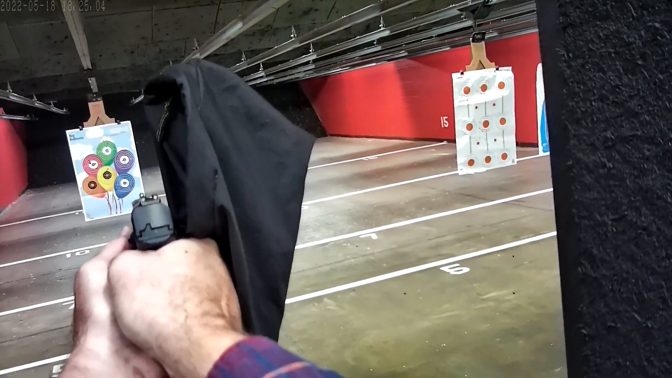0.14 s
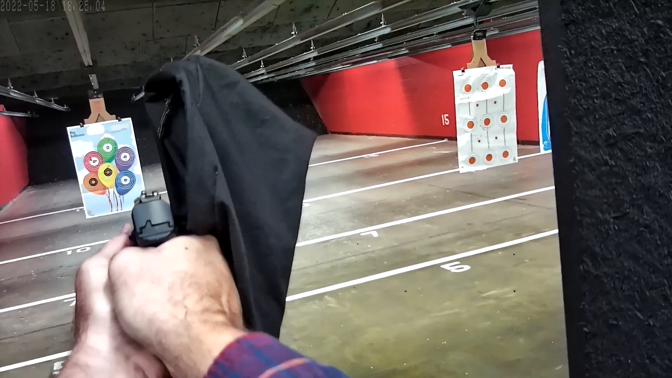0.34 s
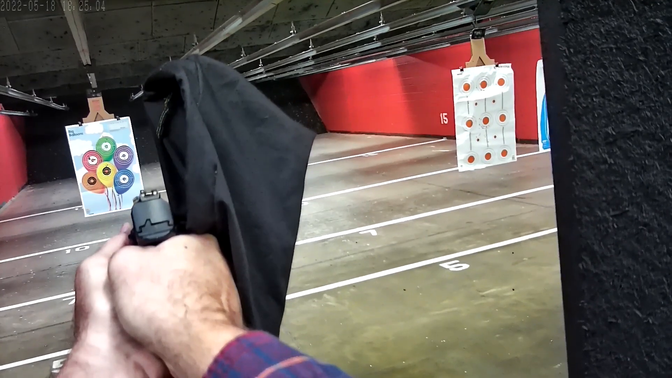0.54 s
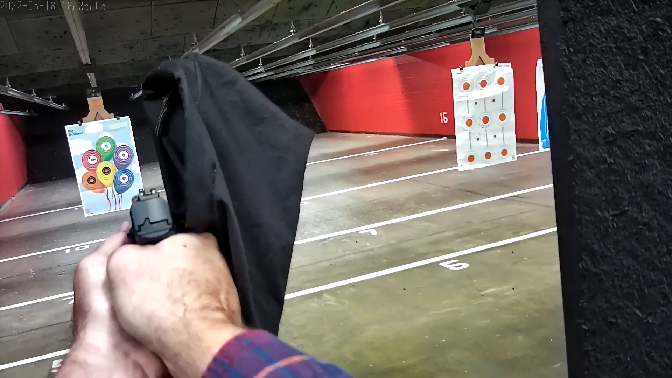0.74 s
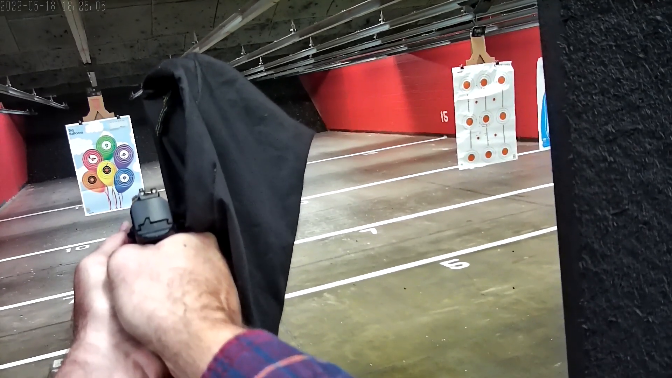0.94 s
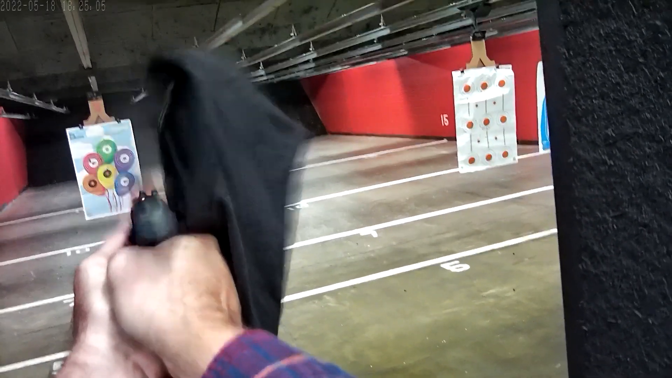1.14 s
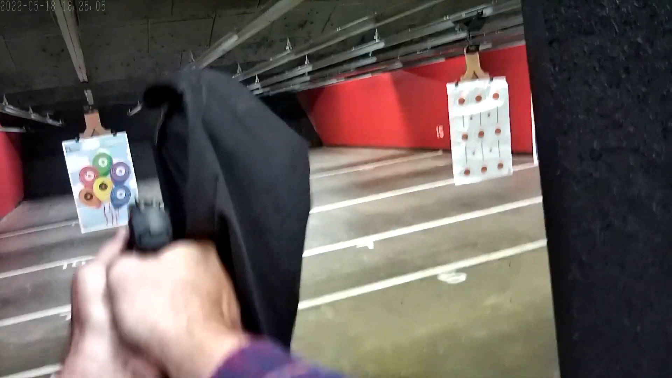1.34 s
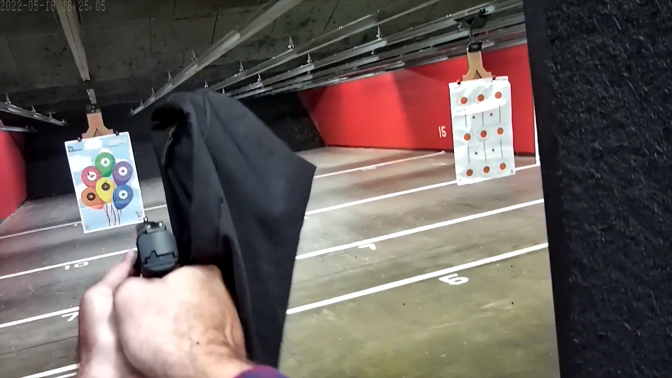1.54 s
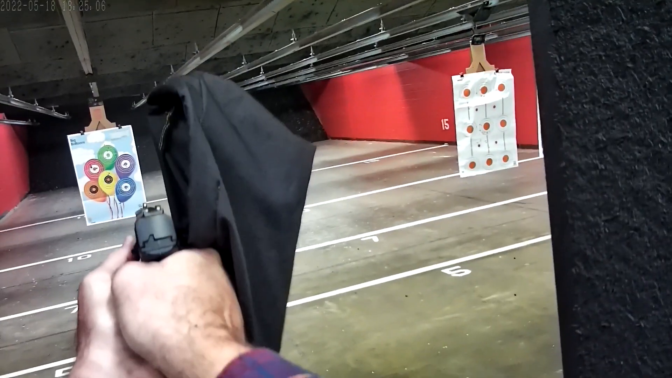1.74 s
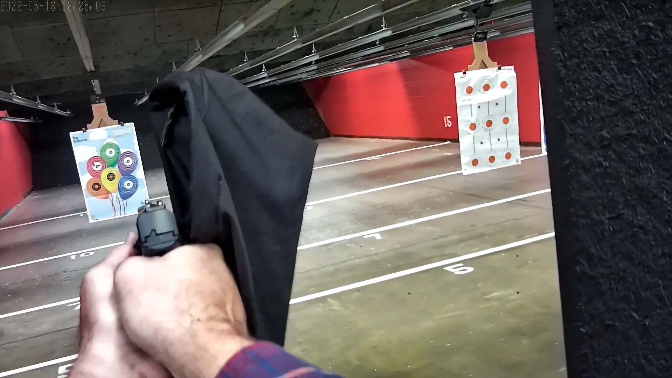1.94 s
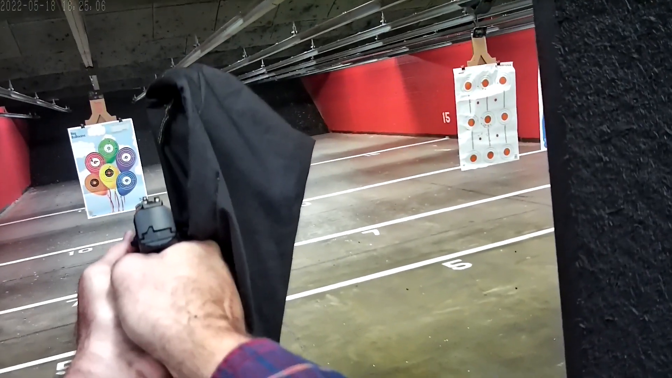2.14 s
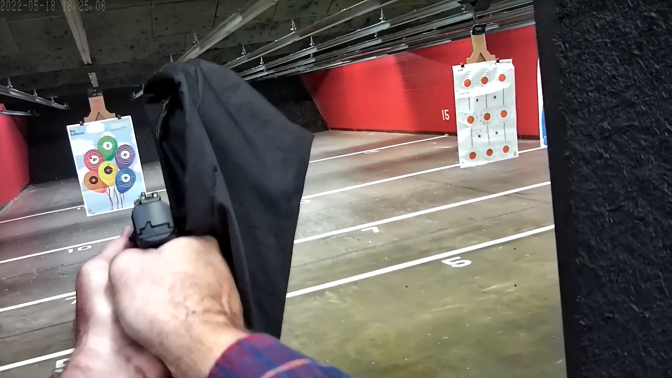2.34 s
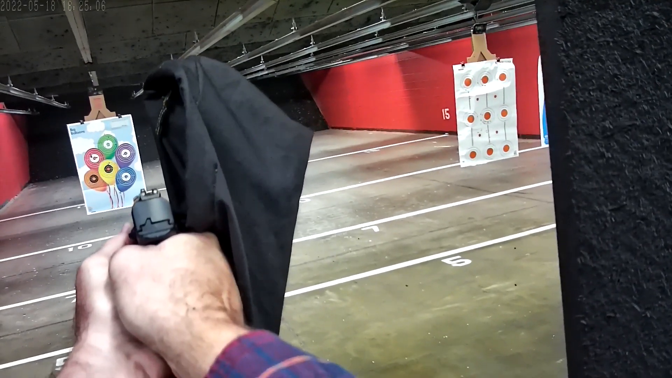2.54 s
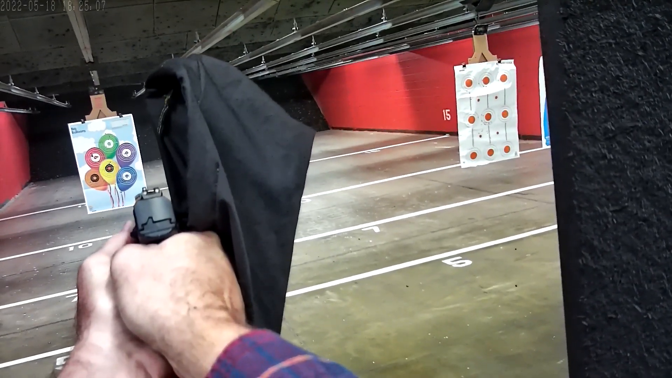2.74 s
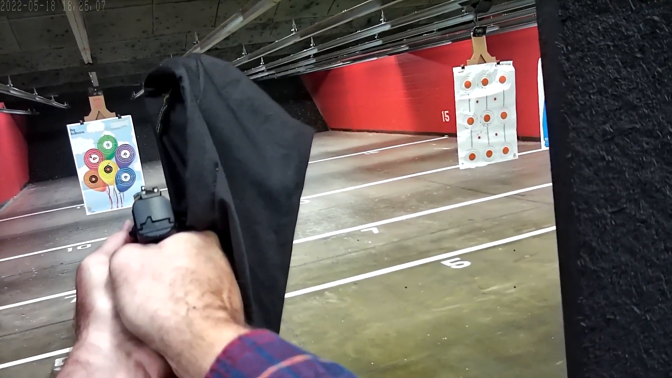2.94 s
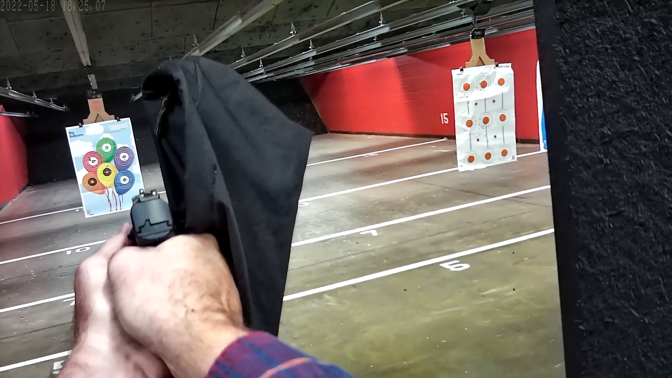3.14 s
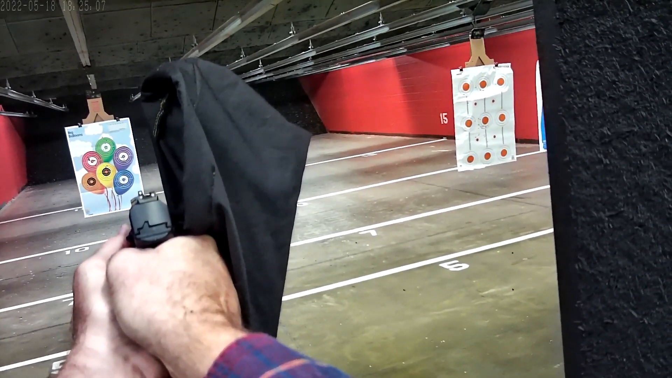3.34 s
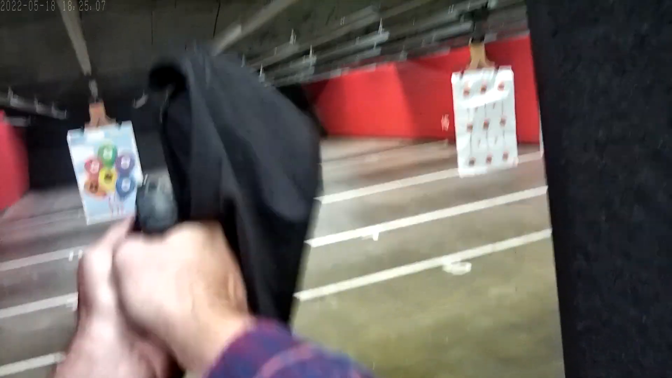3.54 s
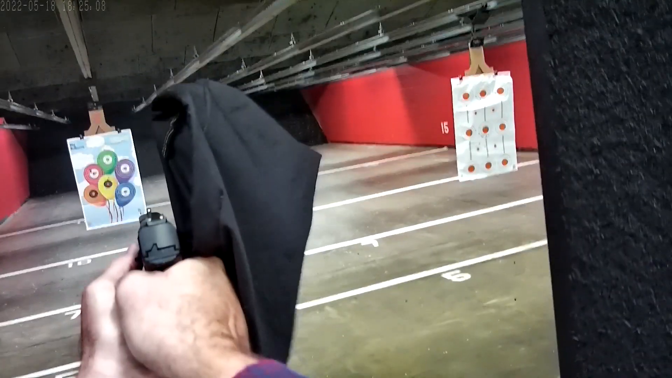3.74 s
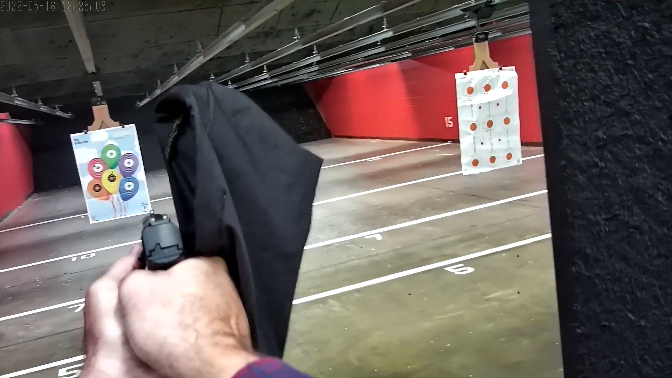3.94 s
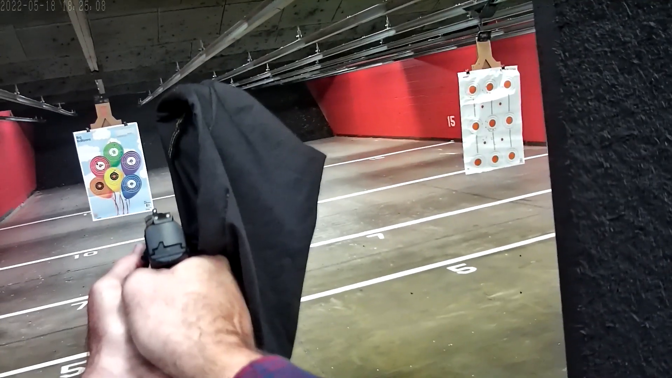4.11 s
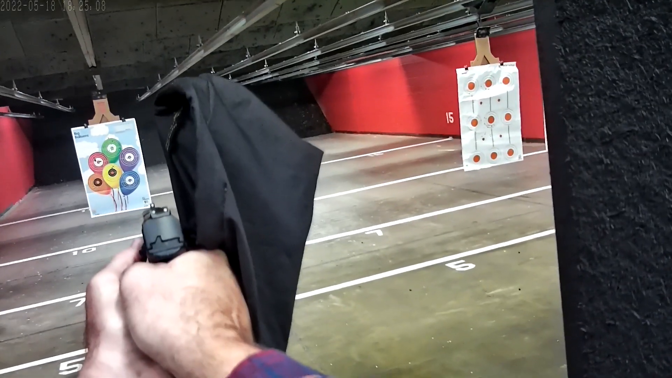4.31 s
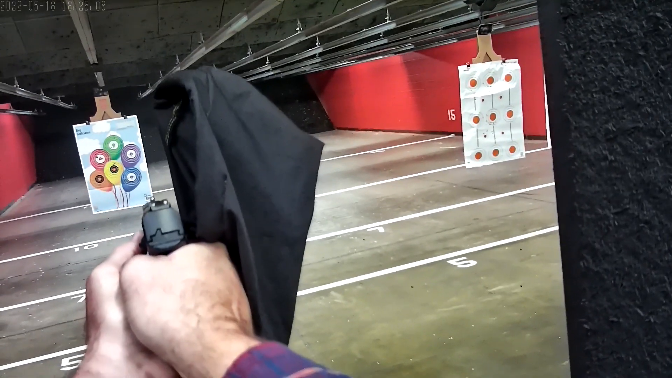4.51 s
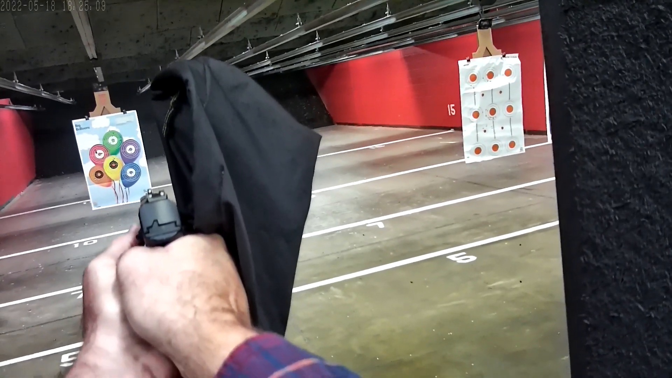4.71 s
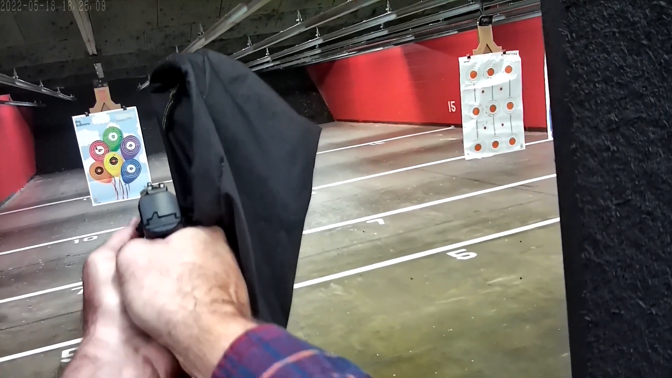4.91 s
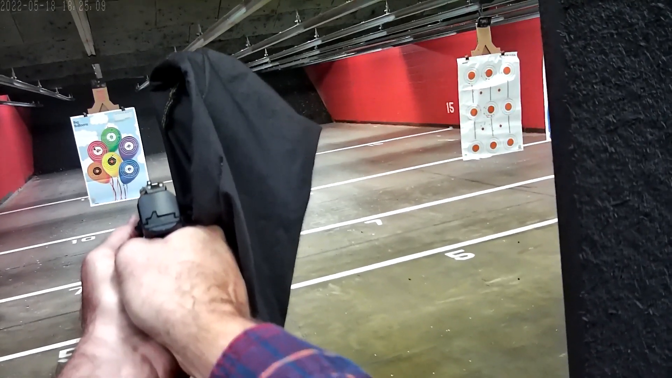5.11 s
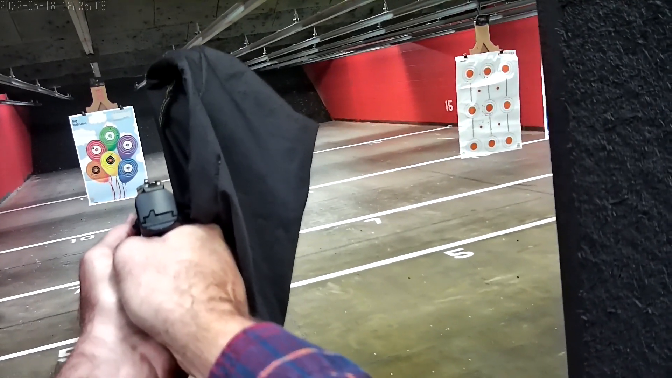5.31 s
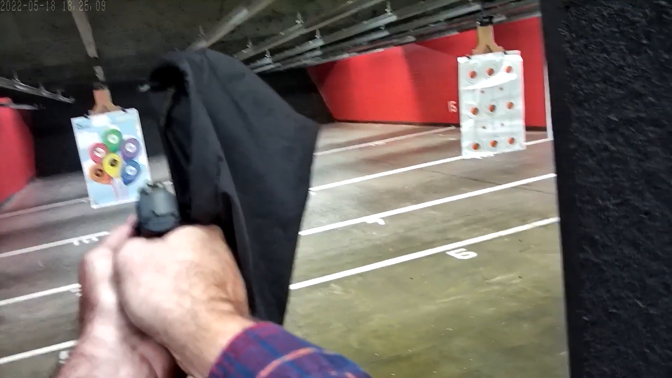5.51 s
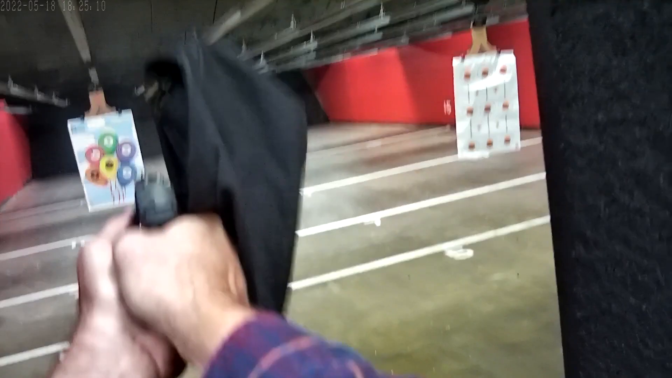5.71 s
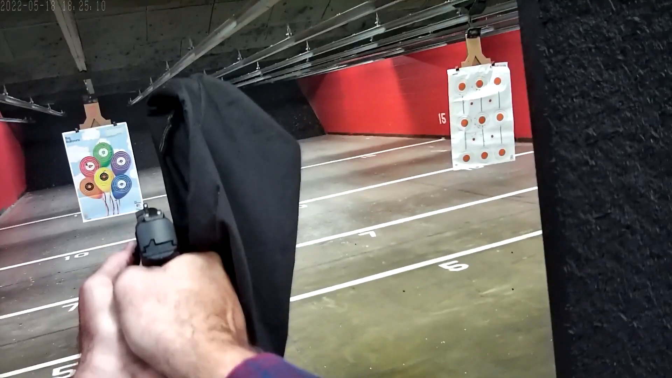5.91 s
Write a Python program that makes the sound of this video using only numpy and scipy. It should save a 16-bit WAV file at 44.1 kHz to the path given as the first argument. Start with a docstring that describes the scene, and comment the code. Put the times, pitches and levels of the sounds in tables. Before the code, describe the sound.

In a hard, low indoor shooting range, two quick shots from other lanes come first, then a close pistol blast, another lane shot, a second close blast, and finally a close shot overlapped by a distant one. All overload the close microphone and leave short booming tails. Hard clacks, high brass tinkles and light ticks fill the gaps over faint ventilation.

```python
"""Pistols in an indoor range

Three pistols fire, one at arm's length and two in other lanes, and overload the microphone.
Each blast is coloured noise that fills the firing line, rolls down the hall and returns from the far end.
Decaying tones make the low room boom, and ring in the clacking parts and in the brass on the concrete.
Steady noise with a faint tone is the ventilation; an earlier shot is still dying away at the start."""
import sys
import numpy as np
from scipy import signal
from scipy.fft import rfft, irfft
from scipy.io import wavfile

SR = 44100
rng = np.random.default_rng(int(sys.argv[2]) if len(sys.argv) > 2 else 0)


def put_to_file(sound):
    """Save the sound as 16-bit audio at rate SR, in the file named by the first command-line argument."""
    columns = np.atleast_2d(sound).T  # one column per channel
    safe = np.clip(columns, -1, 1)
    whole_steps = np.round(safe * 32767)
    wavfile.write(sys.argv[1], SR, whole_steps.astype(np.int16))


N = 262821  # length in samples
AGE = np.arange(2 * SR) / SR  # seconds since a sound began

# Shots at arm's length (near), behind the partition (lane) and further along the line (distant).
# Each row: start in seconds, place, booth level in dB, muzzle crack in dB, hall level in dB.
SHOT_LIST = [ (.519, "lane", 0, 1, -0.5), (.673, "distant", -0.5, -6, -0.5), (1.1228, "near", -2, 12.5, 5),
             (2.4262, "lane", 0, -1, 1), (3.3643, "near", -0.5, 9.5, 5.5), (5.535, "near", -1, 12, 3.5),
             (5.694, "distant", 0.5, -15, -1.5), ]
# Colour of the sound returning from the far end. Each row: frequency in Hz, relative level in dB per Hz.
FAR_COLOUR = [(100, -8), (400, -5), (800, -12), (1350, 5), (2000, 5.5), (2700, -10.5), (3400, -17.5),
              (4000, -5.5), (5100, -40.5), (6100, -34), (7200, -48.5), (16000, -70.5)]
# How long that sound lasts. Each row: frequency in Hz, time to fall 60 dB in seconds.
FAR_DECAY = [(100, 0.54), (1500, 0.92), (4000, 1.48), (10000, 1.1)]
# Colour of hard parts touching. Each row: frequency in Hz, relative level in dB per Hz.
CONTACT_COLOUR = [(50, -28.5), (280, -20), (440, 3), (650, -15), (1000, -3.5), (1270, 5), (1550, -11.5),
                  (1900, 2.5), (3000, -12.5), (3900, -3.5), (5200, -30), (6200, -19.5), (7300, -25.5),
                  (11000, -25), (16000, -34)]


def undb(db):
    """Turn decibels into a gain."""
    return 10 ** (np.asarray(db) / 20)


def along(points, hz):
    """Read a value between (Hz, value) points, on a log-frequency axis."""
    f, value = np.transpose(points)
    return np.interp(np.log(hz + 1), np.log(f), value)


def fade(t60, age=AGE):
    """Exponential decay, 60 dB down after t60 seconds."""
    return np.exp(-np.log(1000) * age / t60)


def shape(x, points):
    """Colour a sound by (Hz, dB) points."""
    gain = undb(along(points, np.fft.rfftfreq(len(x), 1 / SR)))
    return irfft(rfft(x) * gain, len(x))


def noise(points, size=len(AGE)):
    """Noise of the given colour, scaled to an rms of 1."""
    x = shape(rng.standard_normal(size), points)
    return x / x.std()


def reverberation(points, t60s, age=AGE):
    """Dense echoes as fading noise: every half octave dies at its own rate."""
    spectrum = rfft(noise(points))
    hz = np.maximum(np.fft.rfftfreq(len(AGE), 1 / SR), 32)
    half_octaves = 2 * np.log2(hz)
    total = 0
    for k in range(10, 30):  # band centres from 32 Hz upward
        overlap = np.maximum(1 - abs(half_octaves - k), 0)  # neighbouring bands cross-fade
        band = irfft(spectrum * overlap)
        total = total + band * fade(along(t60s, 2 ** (k / 2)), age)
    return total


def clusters(rate, spread_db):
    """Reflections arrive in uneven bunches: a gain that wanders about rate times a second."""
    wander = np.interp(AGE * rate, np.arange(1024), rng.standard_normal(1024))
    return undb(spread_db * wander)


def ring(modes):
    """Sum of decaying tones (Hz, dB, t60 in s), each starting at a random phase."""
    total = 0
    for hz, db, t60 in modes:
        tone = np.sin(2 * np.pi * (hz * AGE + rng.random()))
        total = total + undb(db) * fade(t60) * tone
    return total


def butter(x, hz, kind, order=1):
    """Low-pass or high-pass filter that uses only past sound."""
    return signal.sosfilt(signal.butter(order, hz, kind, fs=SR, output="sos"), x)


def add(track, s, sound):
    """Mix a sound in at time s, in seconds."""
    start = int(s * SR)
    track[start:start + len(sound)] += sound[:N - start]


def earlier_shot(echo_db=-45):
    """The last of an earlier shot is still dying away down range, as fading echoes."""
    out = np.zeros(N)
    add(out, 0, undb(echo_db) * reverberation(FAR_COLOUR, FAR_DECAY))
    return out


def ventilation(air_db=-48, fan_hz=170.0, fan_db=-56):
    """Steady rush of air as coloured noise, with a faint fan tone."""
    # Colour of the moving air. Each row: frequency in Hz, relative level in dB per Hz.
    air_colour = [(25, -19), (45, -5.5), (80, -3), (165, -7), (250, -12), (400, -12), (700, -14.5),
                  (1300, -16), (1900, -19), (2800, -34), (4000, -36.5), (5200, -48), (10000, -45),
                  (16000, -55)]
    air = undb(air_db) * noise(air_colour, size=N)
    fan = undb(fan_db) * np.sin(2 * np.pi * fan_hz * np.arange(N) / SR)
    return air + fan


def pistol(place, blast, crack_colour, booth_db, fill_s, hall_db, far_db, far_s, far_rise_s, crack_t60,
           boom_db, flutter_db, treble_flutter_db, fill_db=5, build_s=0.077, round_trip_s=.063):
    """Shots from one place take the same paths through the room, so they share their echoes."""
    # Decay along the firing line. Each row: frequency in Hz, time to fall 60 dB in seconds.
    booth_decay = [(60, 0.64), (250, 0.5), (1000, 0.4), (4000, 0.36), (12000, 0.46)]
    # Colour of the hall's long reverberation. Each row: frequency in Hz, relative level in dB per Hz.
    hall_colour = [(25, -4.5), (50, 1.5), (80, 4), (120, 5), (200, 0), (500, 5), (1300, 5.5), (2000, 1),
                   (2800, -16), (4000, -10), (5200, -40.5), (6100, -25.5), (7300, -42), (10000, -43.5),
                   (16000, -58.5)]
    # Decay of the hall. Each row: frequency in Hz, time to fall 60 dB in seconds.
    hall_decay = [(60, 3.3), (150, 1.82), (500, 1.32), (1500, 1.98), (4000, 1.7), (8000, 1.5), (14000, 1.8)]
    # Standing waves between floor, ceiling and walls.
    # Each row: frequency in Hz, relative level in dB, time to fall 60 dB in seconds.
    standing_waves = [(52, -36, 1), (92, -23.5, 0.8), (115.8, -14.5, 1.35), (116, -24, 0.67),
                      (132.7, -26, 1.9), (147.3, -21.5, 1.6)]
    # The treble share of the echoes, which flutters by its own amount. Each row: frequency in Hz, gain in dB.
    treble_share = [(1500, -23), (3200, -1)]

    crack = noise(crack_colour) * fade(crack_t60)

    # reflections pile up along the firing line for fill_s before they decay
    fill_left = np.maximum(1 - AGE / fill_s, 0)
    filling = undb(booth_db - fill_db * fill_left) * clusters(rate=120, spread_db=1.0)
    booth = filling * reverberation(blast, booth_decay, np.maximum(AGE - fill_s, 0))

    # the hall and its standing waves take a moment to build up
    roll = undb(hall_db) * reverberation(hall_colour, hall_decay)
    boom = undb(boom_db) * ring(standing_waves)
    hall = (roll + boom) * (1 - np.exp(-AGE / build_s))

    # echoes from down range swell until the back wall's return at far_s, then die away
    swell = np.exp(-(np.minimum(AGE - far_s, 0) / far_rise_s) ** 2)
    far = undb(far_db) * swell * reverberation(FAR_COLOUR, FAR_DECAY, np.maximum(AGE - far_s, 0))
    echoes = hall + far * clusters(rate=120, spread_db=2.0)

    # flutter echo: the wave front passes again with every round trip between the side walls
    front = np.cos(2 * np.pi * AGE / round_trip_s)
    treble = shape(echoes, treble_share)
    rest = echoes - treble
    # a negative flutter level swaps the peaks and dips
    tail = rest * undb(flutter_db * front) + treble * undb(treble_flutter_db * front)

    out = np.zeros(N)
    for s, where, db, crack_db, tail_db in SHOT_LIST:
        if where == place:
            add(out, s, undb(db) * booth + undb(crack_db) * crack + undb(tail_db) * tail)
    return out


def near_action(lead_s=.004, click_db=-17, click_t60=.04, thump_db=-7, thump_hz=32, thump_t60=0.26):
    """Heard only up close: the striker snaps forward, then the muzzle gas pushes on the microphone."""
    out = np.zeros(N)
    for s, where, *_ in SHOT_LIST:
        if where == "near":
            click = noise(CONTACT_COLOUR) * fade(click_t60)
            thump = np.sin(2 * np.pi * thump_hz * AGE) * fade(thump_t60)
            add(out, s - lead_s, undb(click_db) * click)
            add(out, s, undb(thump_db) * thump)
    return out


def clacks(meet_s=0.0055, rise_s=0.0046, contact_t60=0.043, knock_hz=1275, knock_db=-4):
    """Hard parts slide together and hit home, ring briefly and wake the booth."""
    # Clacks in the booth. Each row: start in seconds, contact level in dB, ring in dB, room answer in dB.
    clack_list = [(1.615, -9, -30, -17.5), (2.9385, -11, -16, -19.5), (4.4962, -11, -14, -18.5)]
    # Colour of the booth's answer. Each row: frequency in Hz, relative level in dB per Hz.
    answer_colour = [(30, -12), (120, 0.5), (220, -15), (430, 1.5), (800, -3.5), (1200, -1.5), (2200, -7),
                     (3000, -16.5), (3900, -11), (5200, -28.5), (6200, -19), (7300, -34.5), (10000, -27),
                     (16000, -53)]
    # Decay of that answer. Each row: frequency in Hz, time to fall 60 dB in seconds.
    answer_decay = [(100, .8), (500, 0.45), (1500, 0.46), (4000, 0.43), (12000, 0.36)]
    # Ring of the parts. Each row: frequency in Hz, relative level in dB, time to fall 60 dB in seconds.
    part_modes = [(440, -11, 0.14), (1042, -3.5, 0.19), (1230, -8.5, 0.34), (1267, 15, 0.034),
                  (1325, -5, .1), (1770, -4, 0.13), (2150, -8, 0.068), (2334, -15, .18),
                  (2590, -3.5, 0.075), (3833, -8, 0.11), (4040, -8, 0.11)]

    approach = np.exp(-(np.minimum(AGE - meet_s, 0) / rise_s) ** 2)
    contact = approach * fade(contact_t60, np.maximum(AGE - meet_s, 0))
    # squaring the contact keeps the knock to its hardest moment
    knock = undb(knock_db) * contact ** 2 * np.sin(2 * np.pi * knock_hz * AGE)
    arrival = np.minimum(AGE / meet_s, 1)

    out = np.zeros(N)
    for s, db, ring_db, room_db in clack_list:
        room = undb(room_db) * reverberation(answer_colour, answer_decay)
        ringing = undb(ring_db) * ring(part_modes)
        hit = undb(db) * (contact * noise(CONTACT_COLOUR) + knock)
        add(out, s, hit + arrival * (room + ringing))
    return out


def brass(split_hz=35, twin_db=-6, ring_t60=.3, tick_db=-11, tick_t60=0.01):
    """A case hits the floor with a tick; its slightly oval mouth rings in a close pair of tones."""
    # Bounces of the empty cases. Each row: start in seconds, ring frequency in Hz, level in dB.
    bounces = [(1.743, 10120, -57), (2.071, 10200, -64), (2.11, 10880, -61), (3.288, 10120, -55),
               (3.65, 10800, -58), (4.04, 10130, -45.5), (4.55, 10130, -47), (4.843, 10100, -57.5),
               (4.963, 10170, -61), (5.183, 10140, -65.5), (5.26, 10150, -66.5), (5.33, 10170, -69)]
    out = np.zeros(N)
    for s, hz, db in bounces:
        tick = undb(tick_db) * noise([(2000, -20), (9500, -7), (16000, -4)]) * fade(tick_t60)
        pair = ring([(hz, 0, ring_t60), (hz + split_hz, twin_db, ring_t60)])
        add(out, s, undb(db) * (pair + tick))
    return out


def ticks(skirt_db=-22):
    """Light contacts of handling: short noise, each with one broad resonance."""
    # Small ticks. Each row: start in seconds, centre in Hz, level in dB, time to fall 60 dB in seconds.
    tick_list = [(1.883, 6300, -57, .08), (4.453, 3900, -49, .08), (4.79, 3930, -53, 0.16),
                 (4.843, 5800, -58, 0.034), (4.86, 5300, -63, .12), (4.962, 4280, -49, 0.17),
                 (5.076, 6000, -65.5, 0.027)]
    out = np.zeros(N)
    for s, hz, db, t60 in tick_list:
        below = [(hz / 10, 2 * skirt_db), (hz / 1.3, skirt_db)]
        above = [(hz * 1.14, skirt_db), (hz * 2, 2 * skirt_db)]
        add(out, s, undb(db) * noise(below + [(hz, 0)] + above) * fade(t60))
    return out


def scene():
    """Three pistols and the small sounds of the range, added together at one microphone."""
    # Blasts as they fill the firing line. Each row: frequency in Hz, relative level in dB per Hz.
    near_blast = [(30, -31.5), (60, -23), (120, -3), (250, -6.5), (500, -0.5), (1000, 1), (1800, 2.5),
                  (2800, -18.5), (4000, -15), (5200, -30.5), (9000, -42), (16000, -62)]
    lane_blast = [(30, -34), (60, -35), (120, -6), (250, -7), (450, 2), (700, -2), (1100, 3.5), (1800, -3),
                  (2800, -20.5), (4000, -13.5), (5200, -33), (9000, -42), (16000, -59)]
    distant_blast = [(30, -28.5), (60, -21), (120, -12.5), (250, -6), (600, -0.5), (1000, 0), (1800, -4),
                     (2800, -21.5), (4000, -16.5), (5200, -32.5), (9000, -44), (16000, -59)]
    # Bare muzzle cracks. Each row: frequency in Hz, relative level in dB per Hz.
    near_crack = [(100, -12), (500, -6), (1500, 5.5), (2200, -5), (4000, -4.5), (8000, -18), (16000, -32.5)]
    lane_crack = [(100, -14), (450, -4.5), (1000, 20), (2000, -21), (4000, -9), (8000, -10.5), (16000, -39)]  # serves the distant pistol too

    near = pistol("near", near_blast, near_crack, booth_db=3.5, fill_s=.038, crack_t60=0.081,
                  hall_db=-17.5, boom_db=-6, far_db=-26.5, far_s=0.48, far_rise_s=0.25,
                  flutter_db=0.6, treble_flutter_db=2.6)
    lane = pistol("lane", lane_blast, lane_crack, booth_db=3.5, fill_s=.041, crack_t60=0.066,
                  hall_db=-9.5, boom_db=-3.5, far_db=-26.5, far_s=0.62, far_rise_s=0.3,
                  flutter_db=0.9, treble_flutter_db=0.5)
    distant = pistol("distant", distant_blast, lane_crack, booth_db=4.0, fill_s=0.036, crack_t60=.042,
                     hall_db=-10.0, boom_db=0.5, far_db=-23.0, far_s=.61, far_rise_s=0.24,
                     flutter_db=-0.3, treble_flutter_db=-2.0, fill_db=9.0)
    shots = near + lane + distant + near_action()
    background = earlier_shot() + ventilation()
    small_sounds = clacks() + brass() + ticks()
    return (shots + background + small_sounds)[None]


def record(dry, ceiling=0.7, bass_hz=200, bass_db=-4, coupling_hz=88, top_hz=15900):
    """The blasts square off in the overloaded microphone; its bass lift and coupling tilt the flat tops."""
    # clip at twice the sample rate, so that fewer false tones fold back
    doubled = signal.resample_poly(dry, 2, 1, axis=1)
    clipped = signal.resample_poly(np.clip(doubled, -ceiling, ceiling), 1, 2, axis=1)
    lifted = clipped + undb(bass_db) * butter(clipped, bass_hz, "low")
    coupled = butter(lifted, coupling_hz, "high", order=2)
    # a steep filter removes what lies above top_hz
    return signal.sosfilt(signal.ellip(10, .2, 60, top_hz, fs=SR, output="sos"), coupled)


dry = scene()
out = record(dry)
put_to_file(out)
```